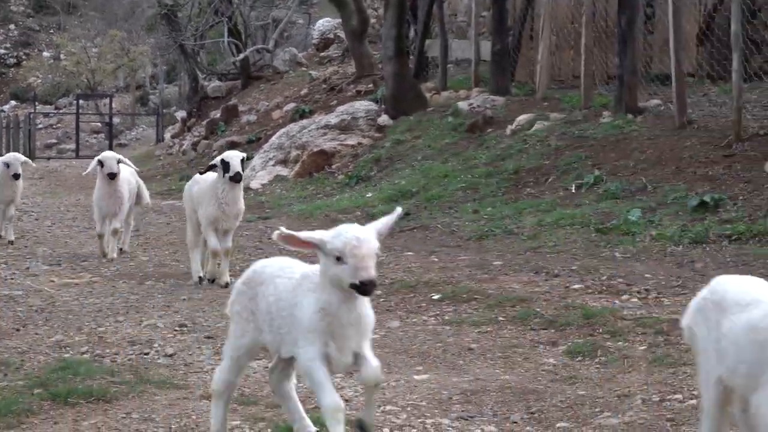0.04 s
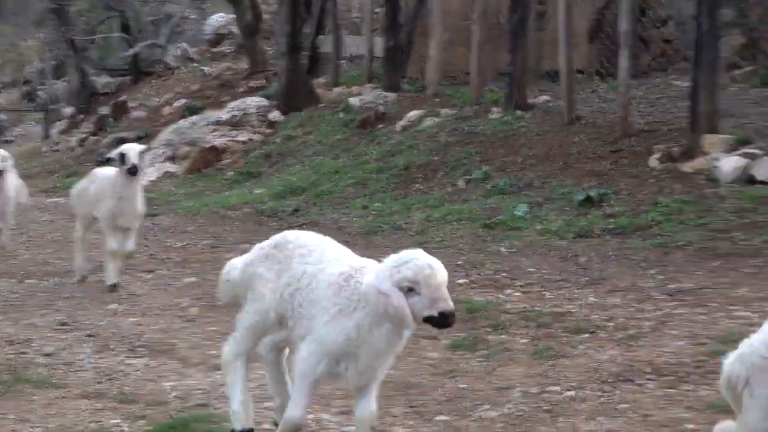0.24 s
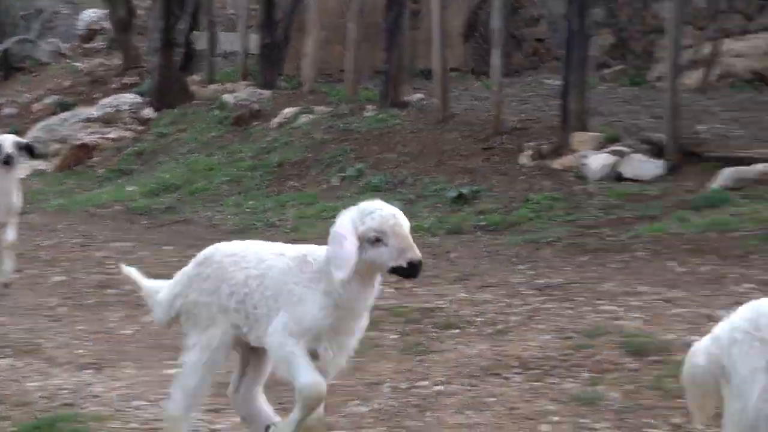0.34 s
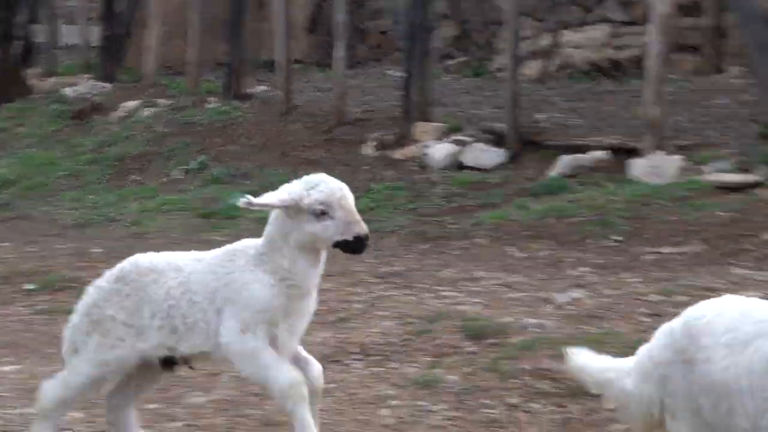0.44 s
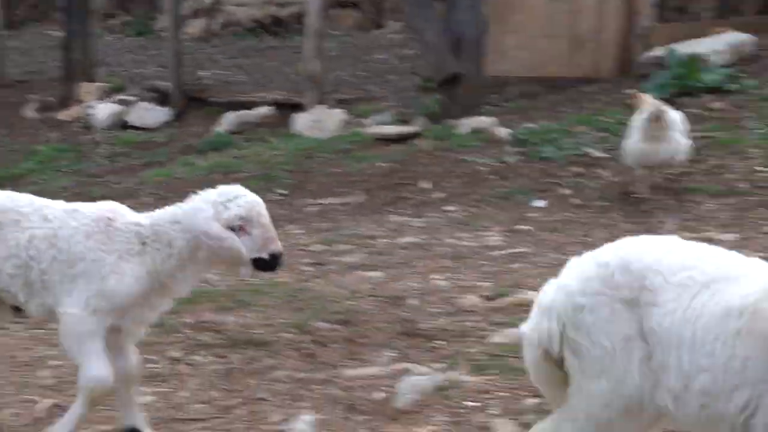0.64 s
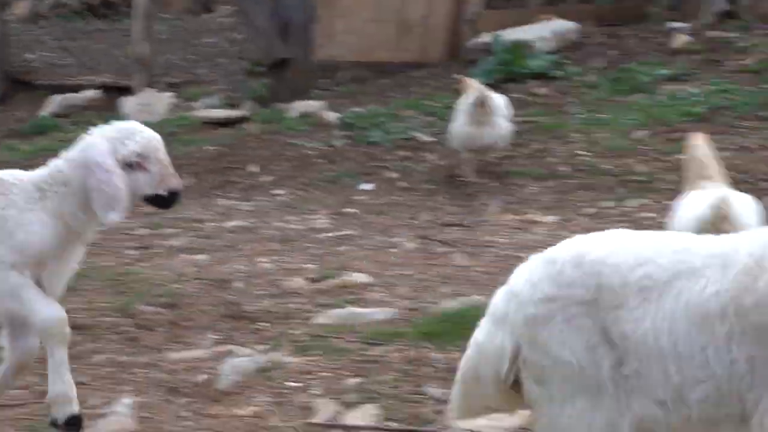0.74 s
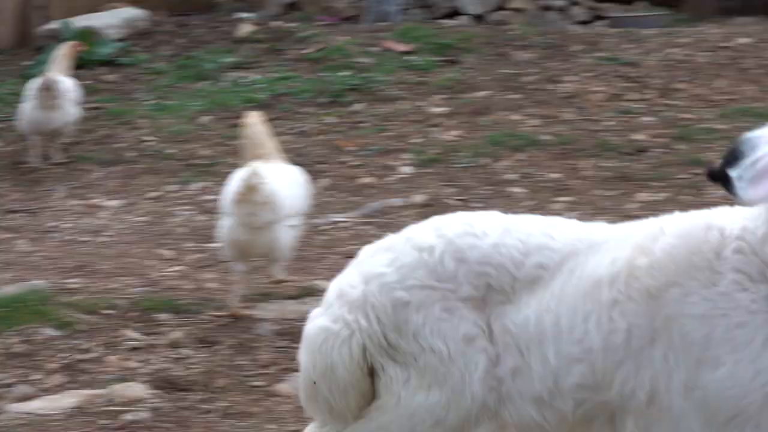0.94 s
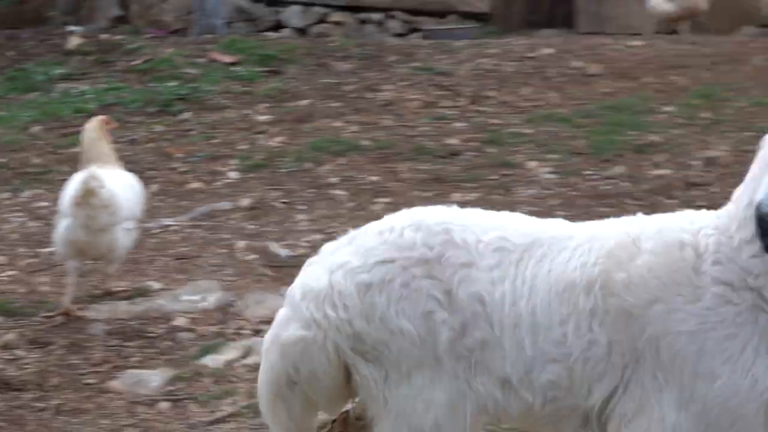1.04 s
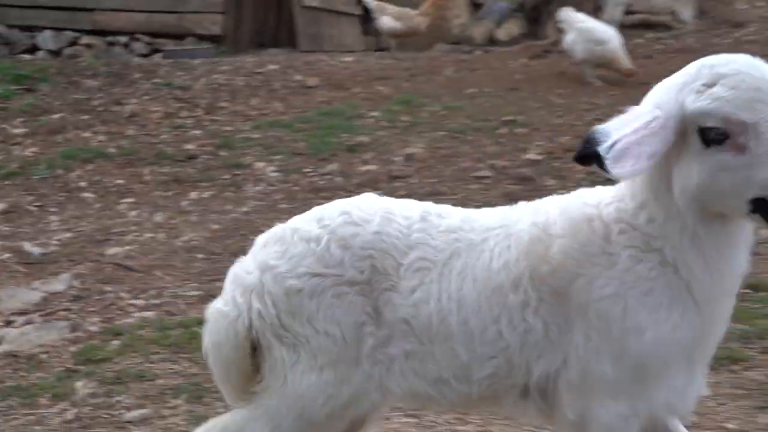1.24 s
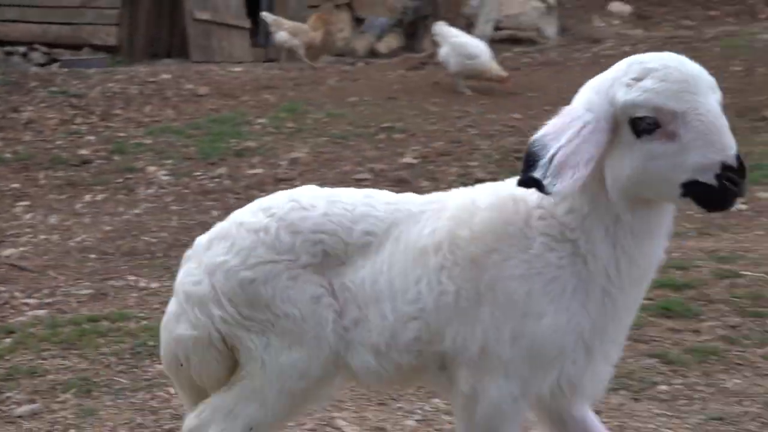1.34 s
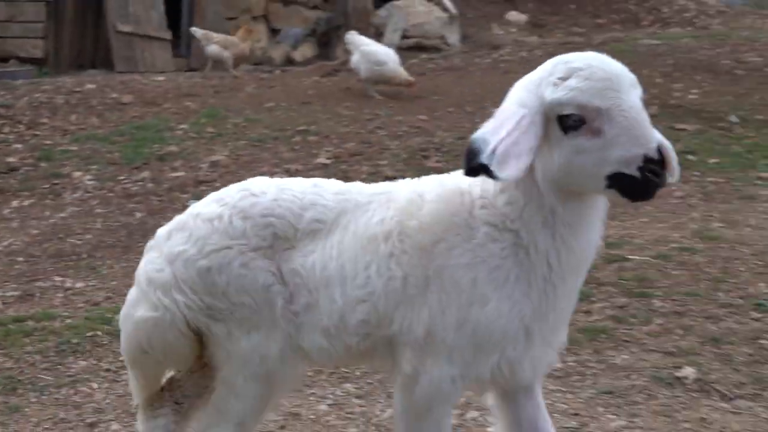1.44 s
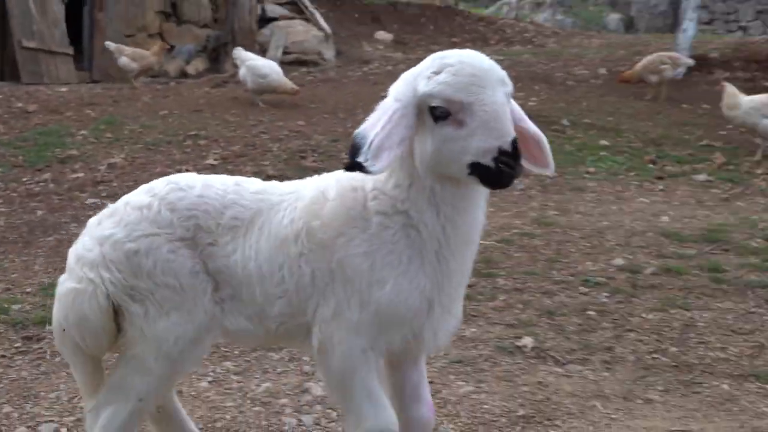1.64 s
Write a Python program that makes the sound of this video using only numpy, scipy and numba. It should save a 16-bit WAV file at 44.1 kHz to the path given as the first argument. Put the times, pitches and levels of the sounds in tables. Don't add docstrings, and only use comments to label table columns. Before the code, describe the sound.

A young lamb gives one long quavering bleat as hooves knock and crunch on gravel

```python
import sys
import numpy as np
from scipy import signal
from scipy.io import wavfile
from numba import njit

SR = 44100
rng = np.random.default_rng(int(sys.argv[2]) if len(sys.argv) > 2 else 0)


def to_linear_factor(level_db):
    exponent = np.asarray(level_db, float) / 20
    return 10 ** exponent


def master_out(mix):
    frames = np.transpose(np.atleast_2d(mix))
    ceiling = np.clip(frames, -1, 1)
    pcm = np.round(ceiling * 32767).astype(np.int16)
    wavfile.write(sys.argv[1], SR, pcm)


N = 74970
TIME = np.arange(N) / SR


def rms_one(x):
    return x / np.sqrt(np.mean(x ** 2) + 1e-20)


def at_hz(points, hz):
    table_hz, value = np.transpose(points)
    return np.interp(np.log(hz), np.log(table_hz), value)


def drift(rate_hz):
    r = np.exp(-2 * np.pi * rate_hz / SR)
    settle = SR // 2
    wander = signal.lfilter([1], [1, -2 * r, r * r], rng.standard_normal(N + settle))
    return rms_one(wander[settle:])


def panned(x, pan_db):
    return x * to_linear_factor(np.array([[.5], [-.5]]) * pan_db)


def bandpass(x, order, edges_hz):
    return signal.sosfilt(signal.butter(order, edges_hz, "band", fs=SR, output="sos"), x)


def ring(clicks, hz, t60_s):
    r, w = to_linear_factor(-60 / (t60_s * SR)), 2 * np.pi * hz / SR
    return signal.lfilter([0, np.sin(w)], [1, -2 * r * np.cos(w), r * r], clicks + 1e-18)


@njit
def resonate(x, hz, r, rate):
    y = np.zeros(len(x))
    for i in range(2, len(x)):
        drive = (1 - r * r) / 2 * (x[i] - x[i - 2])
        y[i] = drive + 2 * r * np.cos(2 * np.pi * hz[i] / rate) * y[i - 1] - r * r * y[i - 2]
    return y


def resonance(x, hz, width_hz):
    return resonate(x, hz + np.zeros(len(x)), np.exp(-np.pi * width_hz / SR), SR)


def colour(white, spectrum, patchy_db, alike):
    out, edges_hz = 0, 50 * 2 ** np.arange(0, 8.6, .5)
    for k, (low, high) in enumerate(zip(edges_hz, edges_hz[1:])):
        hz = np.sqrt(low * high)
        mid, side = bandpass(white[k % len(white)], 2, [low, high])
        c = np.clip(at_hz(alike, hz), 0, 1)
        band = np.sqrt(1 + c) * mid + np.sqrt(1 - c) * side * [[1], [-1]]
        out = out + to_linear_factor(at_hz(spectrum, hz) + patchy_db * drift(7.1)) * band
    return out


# f/Hz, level/dB per Hz
AIR_SPECTRUM = [(41, -31), (70, -2), (313, -18), (375, -11.5), (792, -18), (887, -14), (1750, -18.5),
                (4970, -23.5), (15800, -36)]
# f/Hz, likeness/0-1
AIR_LIKENESS = [(60, .99), (130, 0.99), (400, 0.77), (900, 0.27), (3000, 0.46), (15000, 0.24)]


def air():
    white = rng.standard_normal((2, 2, N))
    return to_linear_factor(-51.5) * rms_one(colour(white, AIR_SPECTRUM, 0.87, AIR_LIKENESS))


# t/s, level/dB
ENGINE_LEVEL = [
    (0, -45),
    (.3, -51),
    (.6, -46),
    (.9, -46.5),
    (1.15, -49),
    (1.45, -44.5),
    (1.7, -49.5),
]


def rumble():
    engine_hz, width_hz, hum_share = 37.9, 14.4, 0.5
    noise = rng.standard_normal(N + SR)
    for _ in range(2):
        noise = resonance(noise, engine_hz, width_hz)
    hum = np.sin(2 * np.pi * np.cumsum(engine_hz * (1 + 0.053 * drift(3.34))) / SR)
    mix = hum_share * rms_one(hum) + (1 - hum_share) * rms_one(noise[SR:])
    return rms_one(mix) * to_linear_factor(np.interp(TIME, *np.transpose(ENGINE_LEVEL)))


# t/s, level/dB, rise/s, t60/s, pan/dB
CRUNCH_EVENTS = [(0.0001, -46.5, 0.00037, .3, 1.5), (0.195, -40.5, 0.0085, 0.67, 7),
                 (0.282, -41.5, 0.0042, 0.33, 5), (0.337, -21.5, 0.0073, 0.19, 4.5),
                 (0.385, -36.5, 0.0024, 0.51, 0.5), (0.445, -41.5, 0.011, 1, 3.5),
                 (0.784, -23.5, 0.0025, 0.19, 3), (.8, -35, 0.019, 0.75, 3), (1.109, -46, 0.0052, 0.3, 0),
                 (1.23, -29.5, 0.012, 0.19, 1), (1.269, -38, 0.0087, 0.3, 1),
                 (1.295, -51, 0.0082, 0.21, -3), (1.45, -59, 0.017, 0.34, 13)]
# f/Hz, level/dB per Hz
GRIT_SPECTRUM = [(200, -18), (800, -8.5), (1500, -2.5), (2800, -8.5), (5300, -12), (6800, -20), (9500, -25),
                 (15500, -56)]


def crunches():
    grains_per_s, spread_db = 12000, 2.5
    power = np.zeros((2, N))
    for s, db, rise_s, t60_s, pan_db in CRUNCH_EVENTS:
        t = np.maximum(TIME - s, 0)
        rise = np.minimum(t / rise_s, 1) ** 2
        fall = to_linear_factor(-60 * np.maximum(t - rise_s, 0) / t60_s)
        power += panned(to_linear_factor(db) * rise * fall, pan_db) ** 2
    mean_power = power.mean(axis=0)
    shape = (2, 2, N)
    sizes = to_linear_factor(spread_db * rng.exponential(1, shape)) * rng.choice([-1, 1], shape)
    grains = sizes * (rng.random(shape) < grains_per_s / SR)
    even = rms_one(colour(grains, GRIT_SPECTRUM, 0, [(60, 0.89), (3000, 1.0), (15000, .6)]))
    energy = np.sum((even * np.sqrt(power)) ** 2)
    alike = [(60, 0.94), (3500, 0.94), (8000, 0.43), (15000, 0.34)]
    out = colour(grains * np.sqrt(mean_power), GRIT_SPECTRUM, 1.53, alike)
    out = out * np.sqrt(energy / np.sum(out ** 2))
    return out * np.sqrt(power / (mean_power + 1e-20))


# t/s, ground push level/dB, hollow knock level/dB
LANDINGS = [(0.022, -49.5, -35), (0.084, -49, -41.5), (0.178, -29, -29), (.198, -25.5, -21),
            (0.213, -46, -23.5), (0.258, -38, -26.5), (.272, -59, -54), (0.292, -29.5, -27),
            (0.321, -33, -39), (0.341, -48, -25), (0.391, -34.5, -57), (0.452, -40.5, -32.5),
            (0.786, -30.5, -23), (1.116, -58, -36.5), (1.234, -36, -26)]
KNOCK_MODES_HZ = [240, 313, 330, 444, 731, 897]


def thuds():
    push_hz, push_t60_s, knock_t60_s, crumble_t60_s = 67.6, 0.152, 0.038, 0.27
    s, push_db, knock_db = np.transpose(LANDINGS)
    at = (s * SR).astype(int)
    push = np.zeros(N)
    push[at] = to_linear_factor(push_db)
    out = ring(push, push_hz, push_t60_s)
    crumble = to_linear_factor(-60 * TIME[:SR // 5] / crumble_t60_s)
    for hz in KNOCK_MODES_HZ:
        clicks = np.zeros(N)
        clicks[at] = to_linear_factor(knock_db - 8 + rng.normal(0, 1, len(s)))
        earth = np.convolve(clicks, crumble)[:N] * rng.standard_normal(N) * 0.054
        earth = signal.lfilter(*signal.butter(2, hz / 2, "high", fs=SR), earth)
        out = out + ring(earth, hz, knock_t60_s)
    return signal.lfilter(*signal.butter(1, 400, fs=SR), out)


# t/s, peak level/dB, f/Hz, pan/dB, t60/s
PEBBLES = [(0.0258, -29, 5600, 0.5, 0.033), (0.0294, -29, 6000, 0.0, 0.031), (0.1206, -36, 7400, .5, 0.027),
           (0.129, -32.5, 4900, 1.0, 0.027), (0.153, -33, 4930, 0.0, 0.033), (0.1863, -28, 6600, -9, 0.011),
           (0.1865, -30.5, 2530, -2, 0.043), (0.2144, -17.5, 5440, 0, .012),
           (0.2144, -15.5, 2250, 0, 0.017), (0.272, -20, 4870, -5, 0.014), (0.452, -25, 5000, -2, 0.013),
           (0.4886, -21.5, 7460, -6, 0.017), (0.562, -32, 8400, -1, 0.01), (0.5651, -28.5, 8200, 7, 0.012),
           (0.65, -36, 8500, 12, .01), (0.7864, -28.5, 9400, -1, 0.027), (0.8214, -21.5, 8500, -11, 0.0058),
           (0.8804, -32, 8770, -1, 0.014), (0.9118, -23, 7670, 16, 0.0089), (0.92, -33, 9000, 8, 0.011),
           (1.1105, -28, 7100, 6, 0.033), (1.2307, -24, 7140, 6, .025), (1.298, -26, 5700, 9, 0.022),
           (1.381, -38, 7000, 9, 0.015), (1.433, -8, 4340, -4.5, 0.01), (1.4345, -13.5, 4500, -4, 0.012),
           (1.4333, -19, 2130, 5, 0.026), (1.4757, -32, 5400, 0.5, 0.059), (1.521, -26, 5600, 6, 0.028),
           (1.5707, -22.5, 4000, -1, 0.013), (1.6424, -35, 5050, 4, 0.026), (1.65, -33, 5100, 8, .02)]
# t/s, level/dB, f/Hz, t60/s
RINGING_STONES = [
    (.198, -45, 5720, .12),
    (.214, -45, 4880, .08),
    (.225, -49, 5700, .1),
    (.257, -44, 2250, .09),
    (.258, -51, 5750, .05),
    (.268, -48, 5300, .05),
    (.289, -52, 4850, .08),
]


def ticks():
    tick_db, snap_db, band_spread = -7.5, -29, 0.26
    out, t = np.zeros((2, N + SR)), np.arange(SR // 10) / SR
    for s, db, hz, pan_db, t60_s in PEBBLES:
        noise = rng.standard_normal(len(t))
        shape = to_linear_factor(-60 * t / t60_s)
        burst = bandpass(noise, 2, hz * np.exp(band_spread * np.array([-1.6, .8]))) * shape
        burst = burst * np.sqrt(np.sum(shape ** 2) / np.sum(burst ** 2)) * .4
        snap = to_linear_factor(snap_db) * bandpass(noise, 4, [6500, 8900]) * to_linear_factor(-60 * t / 0.0049)
        start = int(s * SR)
        out[:, start:start + len(t)] += panned(to_linear_factor(db + tick_db) * (burst + snap), pan_db)
    for s, db, hz, t60_s in RINGING_STONES:
        tone = to_linear_factor(db - 60 * t / t60_s) * np.sin(2 * np.pi * hz * t) * np.minimum(t / 0.0016, 1)
        start = int(s * SR)
        out[:, start:start + len(t)] += panned(tone, 2.7)
    return out[:, :N]


def bird():
    at_s, length_s, pitch_hz, fall_hz, level_db = 0.072, 0.007, 2850, 90, -52
    t = TIME - at_s
    whistle = np.sin(2 * np.pi * (pitch_hz - fall_hz * t / length_s / 2) * t)
    return to_linear_factor(level_db) * np.exp(-(t / length_s) ** 2) * whistle


# t/s, length/s, pitch f/Hz, level/dB, lower resonance f/Hz
MUFFLED_CALLS = [
    (0.278, 0.06, 180, -46.5, 2780),
    (.457, 0.057, 235.4, -40.5, 2040),
]


def soft_calls():
    width_hz, upper_ratio, upper_db = 360, 1.68, -9
    out = 0
    for s, length_s, hz, db, mouth_hz in MUFFLED_CALLS:
        cycles = np.cumsum(hz * (1 + 0.044 * drift(65))) / SR
        pulses = np.diff(np.floor(cycles), prepend=0)
        swell = np.sin(np.pi * np.clip((TIME - s) / length_s, 0, 1))
        pulses = pulses * np.sqrt(np.clip(swell, 0, 1)) * to_linear_factor(db + 38)
        upper = resonance(pulses, mouth_hz * upper_ratio, width_hz)
        out = out + resonance(pulses, mouth_hz, width_hz) - to_linear_factor(upper_db) * upper
    return panned(out, 2.7)


# t/s, taut pitch f/Hz, level/dB, mouth opening/0-1
BLEAT_COURSE = [
    (0.506, 215, -37.5, 0),
    (.54, 249.9, -30.5, 0.2),
    (.61, 250, -28.5, 0.27),
    (0.698, 257.6, -29, 0.41),
    (0.775, 269.8, -28.5, 0.42),
    (0.902, 260.4, -28.5, 0.65),
    (1.03, 252.8, -33.5, 0.88),
    (1.074, 247, -35, 0.75),
    (1.107, 199, -39, 1.04),
]
# t/s, pitch drop f/Hz, half length/s
QUAVER = [
    (0.561, 42, 0.034),
    (0.634, 28.4, 0.036),
    (0.727, 11.6, 0.023),
    (0.796, 30, .022),
    (0.867, 26, 0.028),
    (0.931, 22, 0.029),
    (0.998, 12.8, 0.017),
]


def folds():
    jitter, shimmer_db, breath_db, rasp_db = .012, 1.0, -6.5, -3.0
    release_s, slack_db_per_hz = 0.0052, 0.09
    s, *columns = np.transpose(BLEAT_COURSE)
    hz, level_db, mouth = [np.interp(TIME, s, c) for c in columns]
    slack_hz = np.zeros(N)
    for at, drop_hz, half_s in QUAVER:
        side = np.where(TIME < at, .45, 1)
        slack_hz += drop_hz * np.exp(-np.abs((TIME - at) / half_s / side) ** 3)
    ending = TIME > s[-2]
    rough = jitter * (1 + 2.37 * ending + 0.035 * slack_hz)
    cycles = np.cumsum((hz - slack_hz) * (1 + rough * drift(130))) / SR
    phase = 2 * np.pi * cycles
    pulses = -rms_one(sum(np.cos(k * phase) for k in range(1, 36)))
    shimmer = to_linear_factor(shimmer_db * rng.standard_normal(N))
    pulses = pulses * shimmer[np.round(cycles).astype(int)]
    breath = to_linear_factor(breath_db) * np.diff(rng.standard_normal(N + 1)) * (1 + 0.1 * np.cos(phase))
    breath = breath * (1 + 1.2 * ending + 0.048 * slack_hz)
    rasp = rms_one(rng.standard_normal(N) * (1.1 + np.cos(phase - .6)) ** 1.6)
    gate = np.clip((TIME - s[0]) / 0.0065, 0, 1) * np.exp(-np.maximum(TIME - s[-1], 0) / release_s)
    effort = gate * to_linear_factor(level_db - slack_db_per_hz * slack_hz)
    source = (pulses + breath) * effort
    top = (0.75 * pulses + to_linear_factor(rasp_db) * 2.24 * rasp) * effort
    closing = np.clip((TIME - s[-2]) / (s[-1] - s[-2]), 0, 1)
    return source, top, rasp * effort, slack_hz, mouth, closing


# narrow mouth f/Hz, wide mouth f/Hz, width/Hz, level/dB
THROAT_RESONANCES = [(460, 383, 420, -6.5), (838, 983, 61, 5.5), (1930, 1936, 130, 1.2),
                     (2870, 3220, 227, 2), (3287, 3814, 219, -1), (5140, 5500, 1100, -24),
                     (6250, 6800, 910, -24.5)]
# f/Hz, width/Hz
NASAL_DIPS = [(1300, 520), (2500, 450)]


def lamb():
    closing_hz, hiss_db, hiss_hz, pan_db, pan_from_hz = 167, -26, 10400, 5, 920
    chest_end_db, chest_db_per_hz, cheek_fade_db = -8, .22, -8
    source, top, rasp, slack_hz, mouth, closing = folds()
    voice = 0
    for k, (narrow_hz, wide_hz, width_hz, db) in enumerate(THROAT_RESONANCES):
        hz = narrow_hz + (wide_hz - narrow_hz) * mouth
        gain_db = np.zeros(N)
        if k == 0:
            gain_db += chest_end_db * closing - chest_db_per_hz * slack_hz
        if k == 1:
            hz = hz - closing_hz * closing
        if 1 < k < 5:
            gain_db += 1.6 * drift(23)
        if k == 3:
            gain_db += cheek_fade_db * mouth
        if k == 4:
            hz = hz + 2 * closing_hz * closing
        if k >= 5:
            gain_db += 0.16 * slack_hz
        drive = (top if k >= 5 else source) * to_linear_factor(gain_db)
        voice = voice + (-1) ** k * to_linear_factor(db) * resonance(drive, hz, width_hz)
    voice = 4.99 * bandpass(voice, 3, [300, 6700])
    voice = voice + to_linear_factor(hiss_db) * resonance(rasp, hiss_hz, 3000)
    for hz, width_hz in NASAL_DIPS:
        voice = voice - 0.32 * resonance(voice, hz, width_hz)
    low = signal.lfilter(*signal.butter(1, pan_from_hz, fs=SR), voice)
    return low + panned(voice - low, pan_db), voice


def yard(x):
    t60_s, level_db, cut_hz = 0.36, -20, 15000
    t = TIME[:SR // 2]
    tail = rng.standard_normal((2, len(t))) * to_linear_factor(-60 * t / t60_s) * (t > .003)
    tail = signal.lfilter(*signal.butter(1, cut_hz, fs=SR), tail)
    tail = tail / np.sqrt(np.sum(tail ** 2) / 2)
    return to_linear_factor(level_db) * signal.fftconvolve(x[None], tail, axes=1)[:, :N]


def scene():
    lamb_echo_db, tick_echo_db = 3.5, -12
    background = air() + rumble()
    grit, stones = crunches(), ticks()
    hooves = grit + thuds() + stones
    voice, mono = lamb()
    echoed = to_linear_factor(lamb_echo_db) * mono + (grit + to_linear_factor(tick_echo_db) * stones).mean(axis=0)
    return background + hooves + bird() + soft_calls() + voice + yard(echoed)


def low_pass(x):
    return signal.sosfilt(signal.butter(12, 16500, fs=SR, output="sos"), x)


# f/Hz, width/Hz, added share
CAPSULE_LOW = (7120, 3500, -0.45)
CAPSULE_HIGH = (9500, 1000, 0.45)


def record(dry):
    for hz, width_hz, share in (CAPSULE_LOW, CAPSULE_HIGH):
        dry = dry + share * np.array([resonance(side, hz, width_hz) for side in dry])
    mix = signal.sosfilt(signal.cheby2(10, 60, 16900, fs=SR, output="sos"), dry)
    return low_pass(mix)


dry = scene()
out = record(dry)
master_out(out)
```